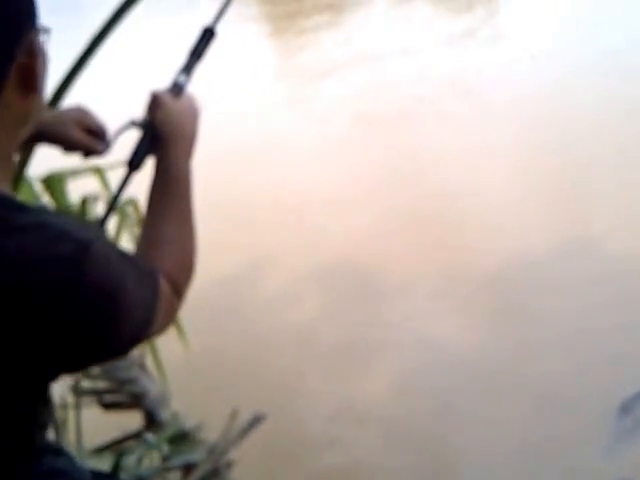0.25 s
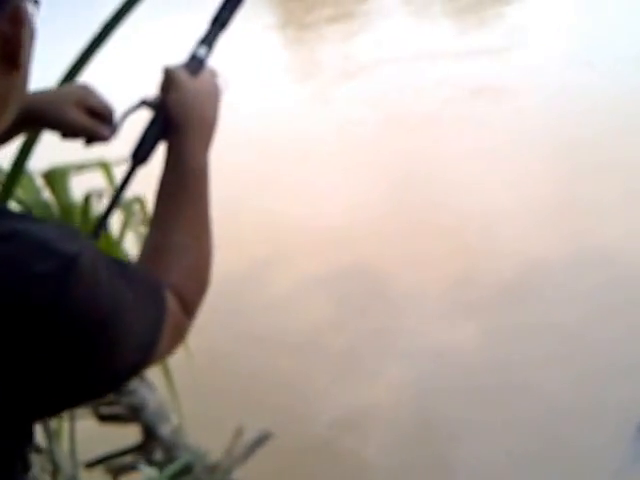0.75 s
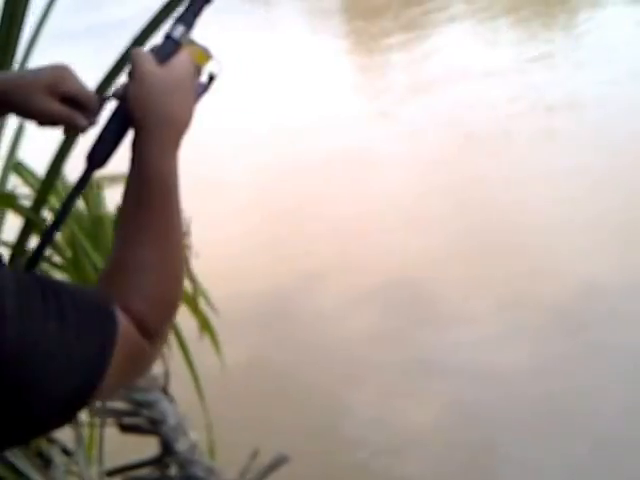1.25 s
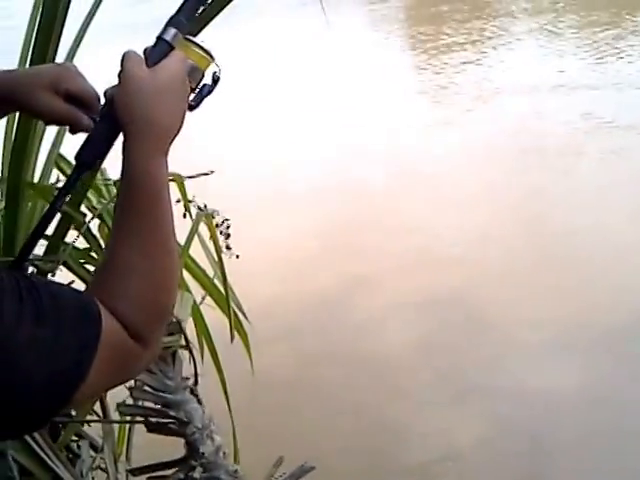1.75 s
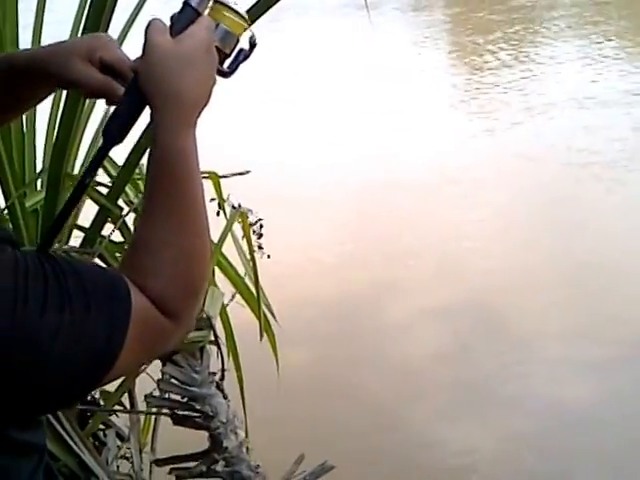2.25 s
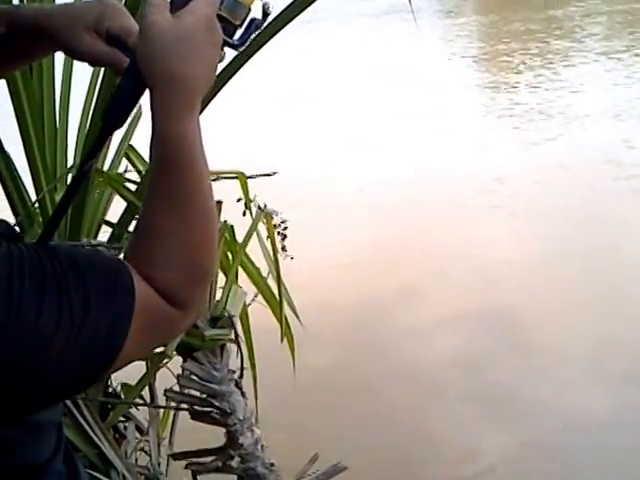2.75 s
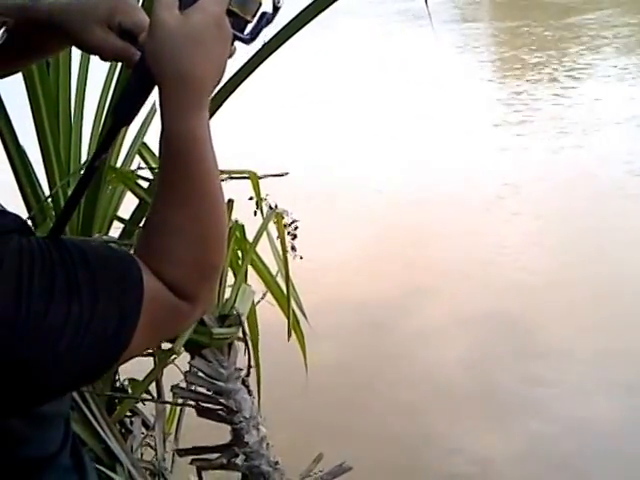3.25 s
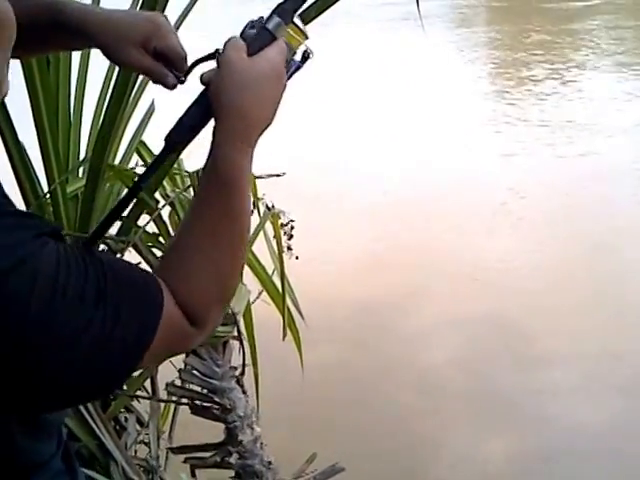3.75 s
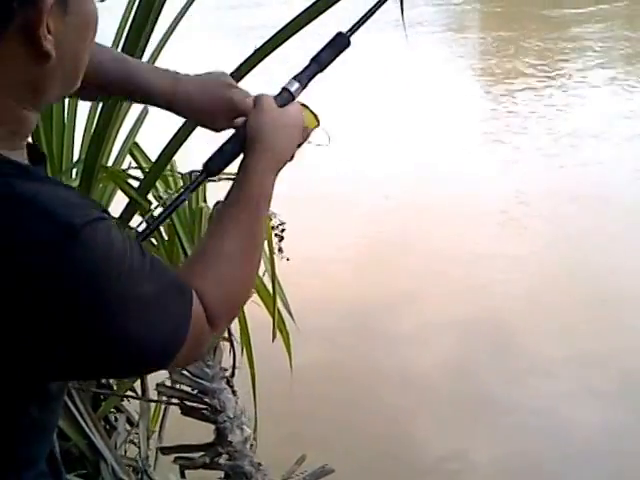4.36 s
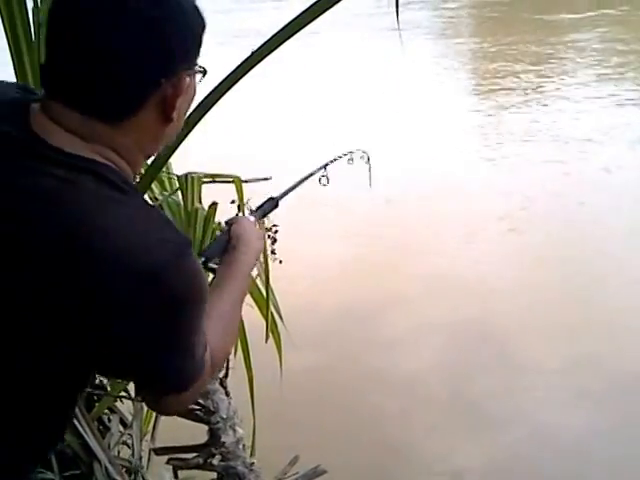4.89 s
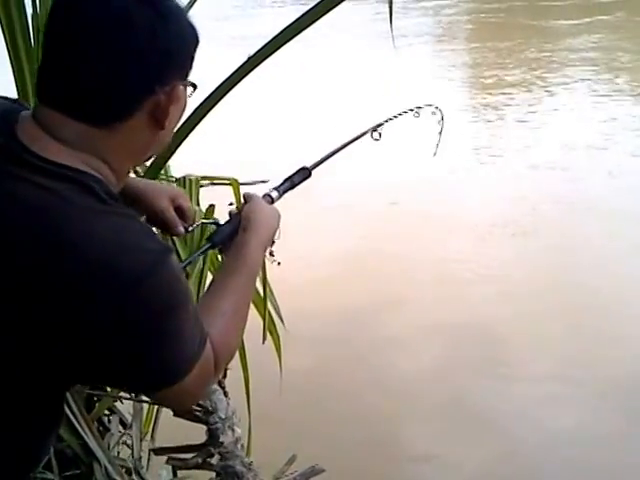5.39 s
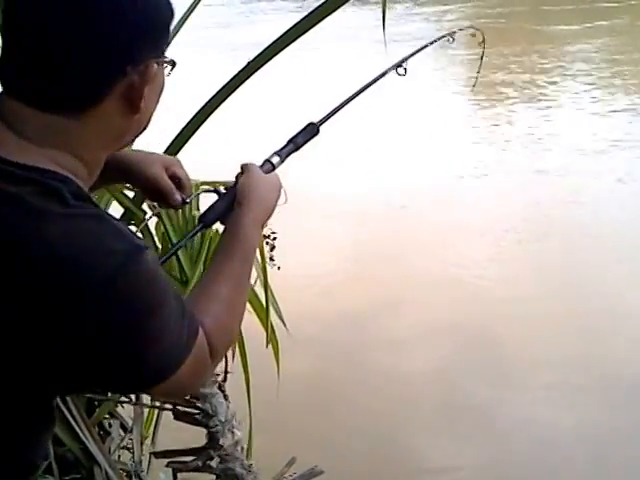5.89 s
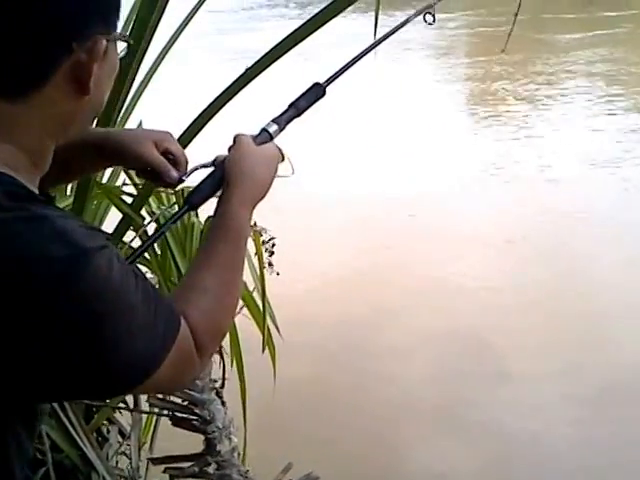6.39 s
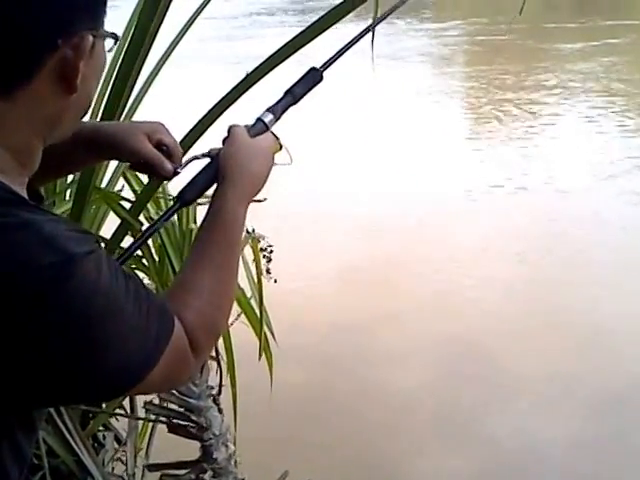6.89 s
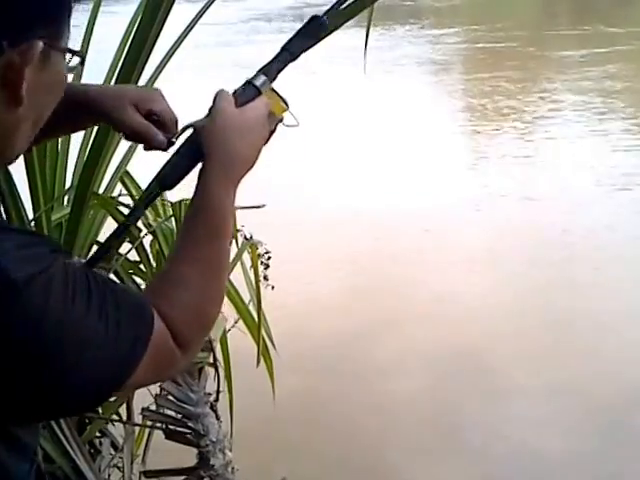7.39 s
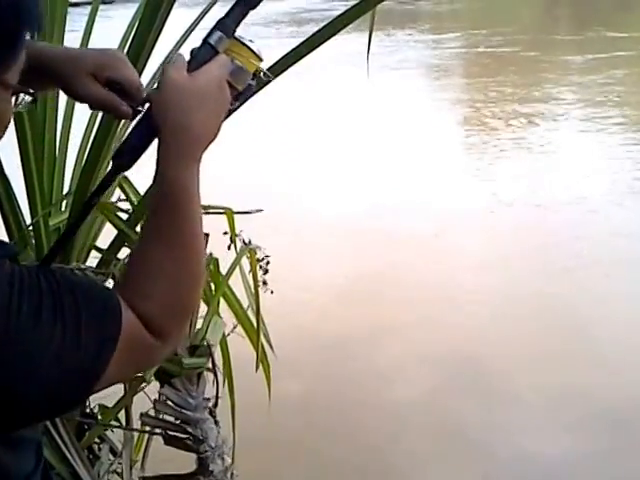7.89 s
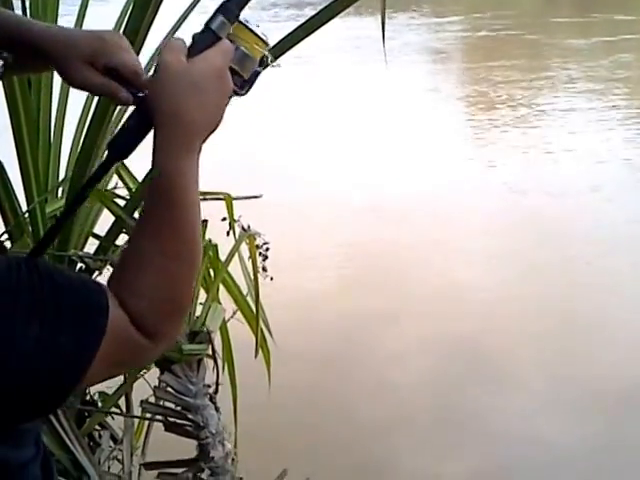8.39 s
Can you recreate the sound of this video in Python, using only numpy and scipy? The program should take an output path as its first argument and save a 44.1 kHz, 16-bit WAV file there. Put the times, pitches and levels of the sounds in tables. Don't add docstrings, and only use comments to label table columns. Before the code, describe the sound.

A shrill cicada chorus around 7 kHz runs throughout, gently throbbing and easing slightly, over thin cricket lines, soft river hiss, low lapping and a barely audible far motor. From 0 to 1.6 s, close fishing-reel ticks and clacks scatter irregularly: a small knock at 0.24, a clatter at 0.6, then a dense burst from 1.0 to 1.25 with a brief bright scrape and the sharpest clacks at about 1.18 and 1.24. Leaves and cloth rustle until 2.0 and again at 2.3. A short rising bird whistle echoes at 2.9; a knock lands at 3.24. From 4.0 to 5.0 the handle grinds grittily with little dry, gliding squeaks. Soft rustling follows at 5.4-6.3, with a short grind near 5.7. The bird repeats louder at 6.4, beside dull knocks until 6.6. Faint rustles and hoarse distant calls remain under the drone to 8.6 s. The sound is bass-light, close handling against a wide outdoor background.

```python
import sys
import numpy as np
from scipy import signal
from scipy.fft import rfft, irfft
from scipy.io import wavfile
from scipy.ndimage import uniform_filter1d

SR = 44100
rng = np.random.default_rng(int(sys.argv[2]) if len(sys.argv) > 2 else 0)


def materialize(psi):
    bounded = np.clip(np.atleast_2d(psi).T, -1, 1)
    quanta = np.round(bounded * 32767).astype(np.int16)
    wavfile.write(sys.argv[1], SR, quanta)


def convert_level_to_amplitude(level_db):
    exponent = np.asarray(level_db, float) / 20
    return 10 ** exponent


N = 381024

# (time [s], middle level [dB], top over middle [dB])
TICKS = [(0.085, -57, -15), (0.4077, -67, -12), (0.7723, -56, 3.5), (0.814, -57, -11), (0.8425, -52, -17),
         (0.879, -58, 4), (0.979, -54, -1), (1.0272, -57.5, 4), (1.0588, -58.5, 5), (1.0701, -53.5, 10),
         (1.1435, -57, 13), (1.1595, -51.5, -1), (1.3321, -61, 9.5), (1.3489, -60.5, 4), (1.4065, -70, 14),
         (1.452, -64, 9), (1.5938, -58, -15), (4.5789, -54.5, 4), (4.747, -56.5, -10.5), (4.9703, -59, 0),
         (5.7609, -53.5, -2), (5.88, -63.5, 3), (5.9015, -70.5, 5), (5.9407, -64.5, 3), (6.211, -65.5, 3)]
# (time [s], middle level [dB], top over middle [dB])
CLACKS = [(0.6126, -50, 4), (0.6163, -49.5, 4.5), (0.6215, -53.5, 3), (0.6262, -51, 4.5),
          (0.6353, -54, 3.5), (0.6565, -44.5, 2.5), (0.6599, -57.5, 8.5), (0.6644, -53.5, 13),
          (0.669, -53.5, -2), (1.0151, -52, 1), (1.0877, -53, 0.5), (1.0998, -51, 0), (1.1382, -47.5, 3),
          (1.176, -33, 0), (1.1821, -54.5, 1.5), (1.1865, -51, 5), (1.194, -53, -2), (1.2222, -55, 5),
          (3.577, -55, -20), (4.2632, -56, 0.5), (4.3006, -54.5, 7)]
# (frequency [Hz], level over the middle [dB])
TICK_BODY = (750, -13.5)
CLACK_BODY = (1250, -4)
# (time [s], body frequency [Hz], body level [dB], crack over body [dB])
KNOCKS = [(0.2445, 1000, -52.5, -3.5), (0.6163, 395, -49.5, -20), (0.9376, 333, -51.5, -27),
          (1.0151, 750, -54, -20), (1.176, 1166, -38, -22), (1.1765, 2170, -36, -22),
          (1.2435, 460, -37.5, 1.5), (1.2443, 1106, -41, -23), (3.2059, 805, -53, -24),
          (3.2436, 905, -46.5, -12), (4.3647, 344, -53, -17), (5.1431, 705, -57.5, 1.5),
          (5.7609, 580, -60, -7.5), (6.281, 346, -54, -4.5), (6.4465, 564.5, -47, -6),
          (6.4561, 294, -54, 3), (6.6183, 660, -41.5, -15.5), (6.6181, 1310, -51, -15)]
# (frequency [Hz], width [Hz], level [dB])
REEL_MODES = [(1600, 1520, -1.5), (2420, 1400, -2), (4500, 3400, -4.5), (5800, 1300, -3.5), (6910, 1160, 4)]
# (time [s], slip rate or
# ring frequency [Hz], level [dB])
SQUEAKS = [
    [(4.05, 1050, -68), (4.085, 1250, -69), (4.11, 1600, -73), (4.14, 1570, -71.5), (4.165, 1606, -57.5),
     (4.185, 1600, -58.5), (4.2, 1340, -68.5)],
    [(4.205, 1193, -58), (4.235, 1310, -69.5), (4.255, 1513, -52), (4.275, 1520, -67)],
    [(4.28, 1228, -66), (4.32, 1190, -62), (4.365, 1190, -65)],
    [(4.42, 1240, -69), (4.47, 1770, -60.5), (4.49, 1950, -70)],
    [(4.5, 2103, -82), (4.535, 2694, -62), (4.555, 2376, -63.5), (4.585, 2360, -60), (4.62, 1470, -72),
     (4.635, 1250, -81)],
    [(4.64, 1270, -68.5), (4.67, 1443, -75), (4.7, 1622, -66.5), (4.72, 1956, -68.5), (4.735, 2223, -63),
     (4.75, 1830, -68.5), (4.77, 1294, -60), (4.78, 1300, -74.5)],
    [(4.862, 1890, -72.5), (4.875, 1940, -59), (4.887, 1960, -80)],
    [(4.87, 1000, -74), (4.92, 1300, -67), (4.97, 1510, -75.5)],
    [(5.67, 1473, -73.5), (5.71, 1440, -71.5), (5.75, 1370, -73)],
]
SQUEAK_GRIP_DB = [0, -8, -16, -14, 2.5, 1.5, 1.5, -1.5, 3.5]
# (frequency [Hz], gain [dB])
SPOOL_RESPONSE = [(1000, 0.5), (1600, 1.5), (2300, 1), (2700, 8.5), (3200, 10), (3900, 9), (4700, 8),
                  (7000, -10)]
# (time [s], length [s], level [dB])
GRIND = [
    (4.02, .37, -53.5),
    (4.35, .3, -56.5),
    (4.63, .37, -54.5),
    (5.648, 0.13, -54),
]
# (frequency [Hz], width [Hz], level [dB])
GRIT_MODES = [(1207, 23, -9), (1520, 180, -6.5), (2100, 340, -8), (2650, 530, 1), (3210, 130, -1),
              (3850, 240, 4), (4600, 120, 1.5), (5340, 200, 2), (5750, 180, -4)]
# (time [s], length [s], dull level [dB], bright level [dB])
RUSTLE = [(0, 0.19, -68, -73.5), (0.619, 0.46, -65.5, -67), (1.023, .14, -61.5, -63.5),
          (1.124, 0.19, -57, -58), (1.33, 0.31, -69.5, -65), (1.575, .45, -61.5, -61),
          (2.296, 0.21, -66, -72), (5.02, .15, -73.5, -74), (5.374, .3, -62, -63.5),
          (5.623, 0.18, -59.5, -62.5), (5.898, .45, -65.5, -74.5), (7.197, 0.31, -67, -73),
          (7.85, .35, -71, -71.5)]
# (time [s], frequency [Hz], level [dB])
SCRAPE = [(1.04, 4600, -68.5), (1.055, 5500, -37), (1.09, 5280, -39), (1.115, 5100, -49),
          (1.135, 5040, -47.5), (1.15, 5000, -78)]
# (time [s], length [s], top frequency [Hz], level [dB])
BIRD = [
    (2.897, .148, 4957, -48.5),
    (6.425, .11, 5080, -41.5),
]
# (share of length [0-1], share of top frequency [0-1], level [dB])
WHISTLE = [(0, .66, -24.5), (.15, .79, -8.5), (.32, .93, -6), (.48, 1, -0.5), (.72, 1, -3), (.8, .95, -6),
           (1, .865, -11.5)]
# (time [s], level [dB])
CHORUS = [(0.0, -48), (0.77, -49), (1.01, -49), (2.02, -51), (2.33, -50), (3.37, -51.5), (3.46, -52),
          (4.38, -50), (4.64, -51), (5.8, -51), (5.97, -52.5), (6.42, -51.5), (6.83, -53), (7.39, -52.5),
          (8.64, -52.5)]
# (time [s], lead of the throb [cycles], throb depth [0-1])
THROB = [(0, 0.12, 0.56), (.6, 0.46, 0.3), (1.5, .36, 0.15), (2.1, 0.32, 0.4), (2.6, 0.6, 0.1),
         (3.3, 0.76, 0.3), (3.9, 0.56, 0.44), (5, 1, 0.4), (5.6, 0.85, 0.38), (6.2, 0.9, 0.5),
         (6.7, 0.5, 0.1), (7.3, .56, 0.5), (8, 0.19, 0.2), (8.64, .43, 0)]
# (frequency [Hz], width [Hz], level [dB])
HIGH_BELLY = [(7399, 335, -0.5), (7000, 350, -3.5), (7345, 170, -7)]
LOW_BELLY = [(6737, 350, 2), (6365, 300, -7)]
# (frequency [Hz], level [dB])
CRICKETS = [(5930, -71.5), (5790, -73.5), (5520, -79)]
# (time [s], level [dB])
CRICKET_FADE = [(0, -2), (.9, 3), (1.5, -1), (3, 0), (4, -4.5), (8.64, -5.5)]
# (time [s], length [s],
# frequency [Hz], level [dB])
FAR_CALLS = [(0.039, 0.1, 1660, -69), (1.647, 0.1, 4600, -63.5), (1.74, 0.16, 4700, -69),
             (2.149, 0.58, 1924, -73.5), (2.404, 0.1, 1600, -69.5), (2.972, 0.21, 1520, -67.5),
             (3.6, 0.16, 1760, -62), (6.389, 0.06, 5330, -55), (6.383, 0.059, 2800, -59),
             (7.254, 0.22, 2090, -71.5), (7.9, 0.13, 1810, -66)]
# (multiple of the firing rate [1], level [dB])
MOTOR = [(4, -80.5), (5, -79.5), (6, -78.5), (7, -75.5), (8, -79), (9, -79.5), (10, -81.5), (11, -83),
         (12, -83.5), (13, -81)]
# (time [s], level [dB])
MOTOR_RISE = [(0, -1), (3, -2), (4.5, 1.5), (8.64, 3)]
# (frequency [Hz], density [dB per Hz])
AIR = [(130, -8.5), (200, -3), (260, -1), (420, 1.5), (600, -0.5), (850, -3), (1300, -6), (2200, -7),
       (3200, -8.5), (4200, -9.5), (5300, -10), (6000, -8.5), (8000, -16.5)]
# (time [s], level [dB])
LAPS = [(1.08, 5.5), (1.85, 2), (2.65, 3.1), (4.14, 1.5), (5.63, 3.3), (6.42, 3.2), (7.05, 1.5),
        (8.06, 1.8)]


def knocks():
    body_cycles, crack_s, tail_s, tail_db = 3.2, 0.0016, 0.019, -19
    hits = []
    for rows, (hz, low), smear in ((TICKS, TICK_BODY, 3.0), (CLACKS, CLACK_BODY, 1)):
        hits += [(s, hz, db + low, db, db + top, smear) for s, db, top in rows]
    hits += [(s, hz, db, db + crack, db + crack - 7, 1) for s, hz, db, crack in KNOCKS]

    out, t = np.zeros(N), np.arange(2048) / SR
    for s, hz, low_db, mid_db, top_db, smear in hits:
        fade = np.exp(-t / crack_s / smear) + convert_level_to_amplitude(tail_db) * np.exp(-t / tail_s)
        crack = rng.standard_normal(len(t)) * fade
        hollow = np.sin(2 * np.pi * hz * t) * np.exp(-t * hz * 2 / body_cycles)
        hollow = hollow + 0.55 * ring(crack, hz, 1.5 * hz)
        parts = ((ring(hollow, hz, 3 * hz), low_db + 1.5),
                 (body(crack, REEL_MODES[:2]), mid_db + 0.38),
                 (body(crack, REEL_MODES[2:]), top_db + 5.5))
        start = int(s * SR)
        for x, db in parts:
            onset_rms = np.sqrt(np.mean(x[:SR // 250] ** 2))
            out[start:start + len(t)] += x * convert_level_to_amplitude(db) / onset_rms
    return out


def squeaks():
    shake, catch, out = flicker(.22, 500), flicker(2, 110), np.zeros(N)
    for table, grip_db in zip(SQUEAKS, SQUEAK_GRIP_DB):
        at, edges, (hz, db) = during(table)
        phase = tone(hz * shake[at])
        partials = 0
        for k in range(1, 4):
            gain_db = response(SPOOL_RESPONSE, k * hz) + grip_db * (k > 1) - 15 * (k == 3)
            partials = partials + convert_level_to_amplitude(gain_db) * np.sin(k * phase)
        out[at] += edges * catch[at] * convert_level_to_amplitude(db + 3.0) * partials
    return out


def grinding():
    attack_s, release_s = .08, .035
    grit, out = grains(2800, 1.5), np.zeros(N)
    rings = unit(sum(convert_level_to_amplitude(db) * flicker(2.2, 40) * unit(ring(grit, hz, w)) for hz, w, db in GRIT_MODES))
    rasp = unit(body(grit, [(1710, 1400, 0.5), (4300, 2400, 1.5)]))
    for s, length, level_db in GRIND:
        at, edges, (db,) = during(stroke(s, length, attack_s, release_s, level_db))
        out[at] += edges * convert_level_to_amplitude(db) * (rings[at] + 0.47 * rasp[at])
    return out


def rustle():
    rub, out = grains(4000, 1.8) * flicker(2.6, 45), np.zeros(N)
    dull = unit(body(rub, [(1440, 1400, 0.85), (2160, 1340, -1.7)]))
    bright = unit(body(rub, [(3770, 3000, 0.0011), (5100, 850, 0)]))
    for s, length, *levels in RUSTLE:
        edge_s = .4 * length
        at, edges, (dull_db, bright_db) = during(stroke(s, length, edge_s, edge_s, *levels, rest_db=-12))
        out[at] += convert_level_to_amplitude(-1.0) * edges * (dull[at] * convert_level_to_amplitude(dull_db) + bright[at] * convert_level_to_amplitude(bright_db))
    return out


def scrape():
    out = np.zeros(N)
    at, edges, (hz, db) = during(SCRAPE)
    hiss = unit(body(rng.standard_normal(len(hz)), [(100, 260, 0)]))
    out[at] += edges * convert_level_to_amplitude(db - 4.5) * hiss * np.sin(tone(hz))
    return out


def bird():
    wet_db, t60_s, bank_s, bank_db = -1.5, 0.36, .055, -1
    out, shake = np.zeros(N), flicker(.08, 300)
    for s, length, top, level_db in BIRD:
        course = [(s + length * share, top * pitch, level_db + d) for share, pitch, d in WHISTLE]
        at, edges, (hz, db) = during(course)
        phase = tone(hz * shake[at] ** (1 + 5 * (1 - hz / hz.max())))
        out[at] += edges * convert_level_to_amplitude(db + 6.5) * (np.sin(phase) + convert_level_to_amplitude(-29.5) * np.sin(2 * phase))
    t = np.arange(SR // 2) / SR
    fade = convert_level_to_amplitude(-60 * t / t60_s) + convert_level_to_amplitude(bank_db) * (t > bank_s) * np.exp(-(t - bank_s) / 0.0049)
    scatter = rng.standard_normal(len(t)) * fade * flicker(2.3, 65)[:len(t)]
    scattered = signal.fftconvolve(out, scatter / np.linalg.norm(scatter))[:N]
    return convert_level_to_amplitude(-4) * out + convert_level_to_amplitude(wet_db) * scattered


def cicadas():
    throb_hz, low_db, low_follows = 18, -55.5, .6
    beat = np.cos(2 * np.pi * (throb_hz * np.arange(N) / SR + column(THROB, 1)))
    swell = np.sqrt(1 + np.clip(1.09 * column(THROB, 2), 0, .95) * beat)
    high = unit(body(grains(9000, 0.75), HIGH_BELLY)) * swell * flicker(1.0, 6)
    low = unit(body(grains(9000, 0.83), LOW_BELLY)) * swell ** 0.3 * flicker(0.48, 4.2)
    crowd_db = column(CHORUS, 1)
    return high * convert_level_to_amplitude(crowd_db + 1.5) + low * convert_level_to_amplitude(low_db + low_follows * (crowd_db - crowd_db.mean()))


def crickets():
    out = 0
    for hz, db in CRICKETS:
        line = unit(ring(rng.standard_normal(N), hz, 40))
        out = out + convert_level_to_amplitude(db + 2.5) * line * flicker(2.9, 5)
    return out * convert_level_to_amplitude(column(CRICKET_FADE, 1))


def far_calls():
    out = np.zeros(N)
    for s, length, hz, db in FAR_CALLS:
        swell = np.hanning(int(length * SR)) ** 0.31
        breath = unit(body(rng.standard_normal(len(swell)), [(hz, 60 / length, 0)]))
        out[int(s * SR):int(s * SR) + len(swell)] += convert_level_to_amplitude(db) * swell * breath
    return out


def motor():
    firing_hz = 34.75
    phase = tone(firing_hz * flicker(0.0196, 1.5))
    out = 0
    for k, db in MOTOR:
        line = np.sin(round(k) * phase + 7 * rng.random())
        out = out + convert_level_to_amplitude(db + 2) * flicker(1.5, 2.5) * line
    return out * convert_level_to_amplitude(column(MOTOR_RISE, 1))


def air():
    level_db, lap_s = -59.5, 0.24
    hz = np.fft.rfftfreq(N, 1 / SR) + 1
    noise = rfft(rng.standard_normal(N)) * convert_level_to_amplitude(response(AIR, hz))
    half_octave = 2 * np.log2(hz)
    t = np.arange(N) / SR
    lap = unit(convert_level_to_amplitude(sum(db * np.exp(-((t - s) / lap_s) ** 2) for s, db in LAPS)))
    out = 0
    for k in range(12, 27):
        band = irfft(noise * np.clip(1 - abs(half_octave - k), 0, 1), N)
        out = out + band * flicker(1.4, 4) * (lap if k < 21 else 1)
    return convert_level_to_amplitude(level_db) * unit(out)


def column(table, index):
    rows = np.array(table, float)
    return np.interp(np.arange(N) / SR, rows[:, 0], rows[:, index])


def response(table, hz):
    rows = np.array(table)
    return np.interp(np.log(hz), np.log(rows[:, 0]), rows[:, 1])


def unit(x):
    return x / np.sqrt(np.mean(x ** 2))


def ring(x, hz, width):
    return signal.lfilter(*signal.iirpeak(min(hz, .45 * SR), hz / width, SR), x)


def body(x, modes):
    out = 0
    for k, (hz, width, db) in enumerate(modes):
        out = out + (-1) ** k * convert_level_to_amplitude(db) * ring(ring(x, hz, width), hz, width)
    return out


def grains(rate, spread_db):
    hit = np.flatnonzero(rng.random(N) < rate / SR)
    out = np.zeros(N)
    out[hit] = rng.standard_normal(len(hit)) * convert_level_to_amplitude(spread_db * rng.exponential(size=len(hit)))
    return unit(out)


def tone(hz):
    return 2 * np.pi * np.cumsum(hz) / SR


def flicker(db, rate):
    steps = np.repeat(rng.standard_normal(int(N / SR * rate) + 2), 8)
    steps = uniform_filter1d(uniform_filter1d(steps, 8), 8)
    return np.interp(np.arange(N) * rate * 8 / SR, np.arange(len(steps)), convert_level_to_amplitude(1.32 * db * steps))


def stroke(s, length, attack, release, *dbs, rest_db=-15):
    corners = ((s, rest_db), (s + attack, 0), (s + length - release, 0), (s + length, rest_db))
    return [(at, *(db + dip for db in dbs)) for at, dip in corners]


def during(table):
    rows = np.array(table, float).T
    at = slice(int(rows[0, 0] * SR), int(rows[0, -1] * SR))
    t = np.arange(N)[at] / SR
    edges = np.clip(np.minimum(t - t[0], t[-1] - t) / 0.0024, 0, 1)
    return at, edges, [np.interp(t, rows[0], c) for c in rows[1:]]


def scene():
    near = knocks() + squeaks() + grinding() + rustle() + scrape()
    far = bird() + cicadas() + crickets() + far_calls() + motor() + air()
    return (near + far)[None]


def band_limit(x):
    return signal.sosfilt(signal.butter(12, 9030, fs=SR, output="sos"), x)


def record(dry):
    bass_hz, hiss_db, shelf_db = 223, -81.5, -68
    top_hz, shelf_hz, edge_hz = 7800, 8300, 8480
    heard = signal.sosfilt(signal.butter(4, bass_hz, "high", fs=SR, output="sos"), dry)
    hiss = unit(signal.lfilter([1], [1, -.95], rng.standard_normal(dry.shape)))
    heard = heard + convert_level_to_amplitude(hiss_db) * hiss
    kept = signal.sosfilt(signal.ellip(8, .5, 75, top_hz, fs=SR, output="sos"), heard)

    def noise_band(low_hz, high_hz):
        sides = signal.ellip(6, .5, 60, (low_hz, high_hz), "band", fs=SR, output="sos")
        return signal.sosfilt(sides, rng.standard_normal(dry.shape))

    shelf, strip = noise_band(top_hz, shelf_hz), noise_band(shelf_hz, edge_hz)
    loudness = unit(uniform_filter1d(abs(heard), size=256))
    present = uniform_filter1d(1. * (flicker(1, 14) > .9), size=512)
    mix = kept + convert_level_to_amplitude(shelf_db) * loudness * (shelf + convert_level_to_amplitude(2.0) * present * strip)
    return band_limit(mix)


dry = scene()
out = record(dry)
materialize(out)
```